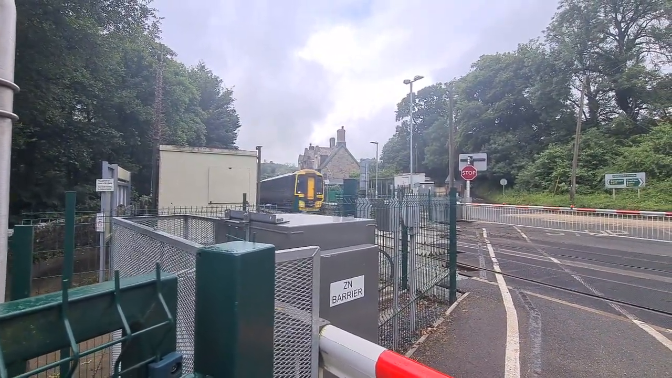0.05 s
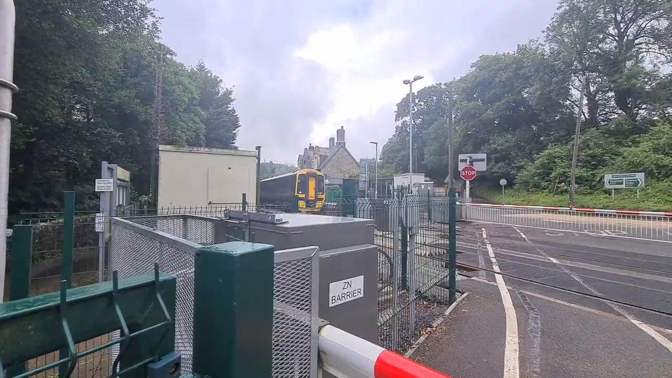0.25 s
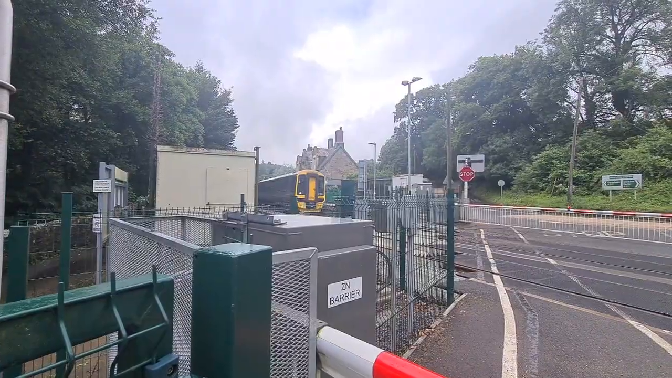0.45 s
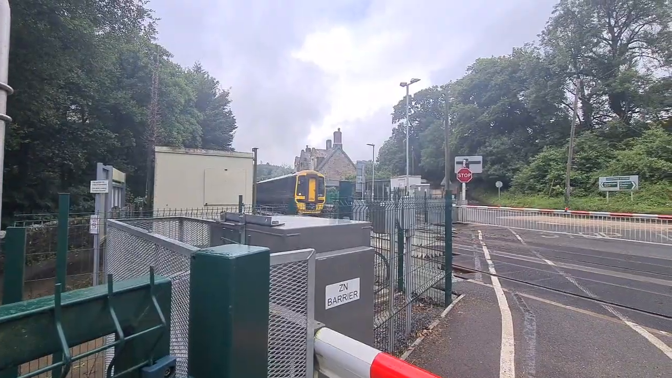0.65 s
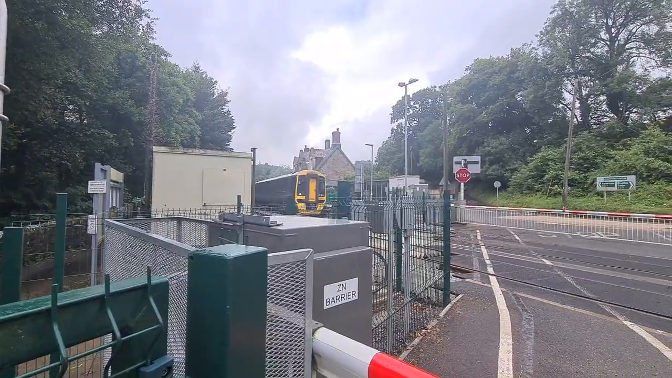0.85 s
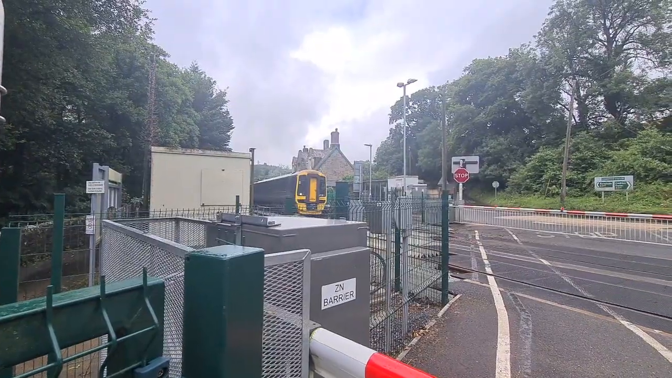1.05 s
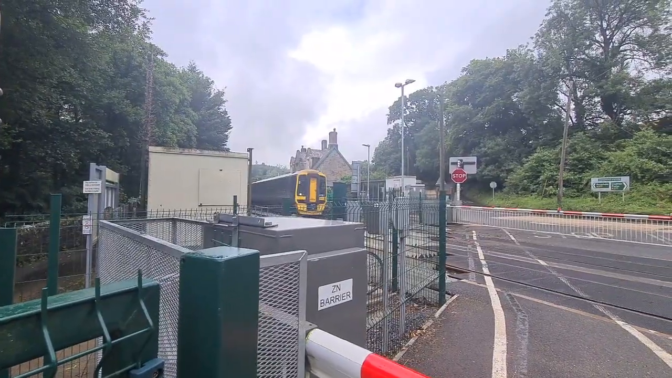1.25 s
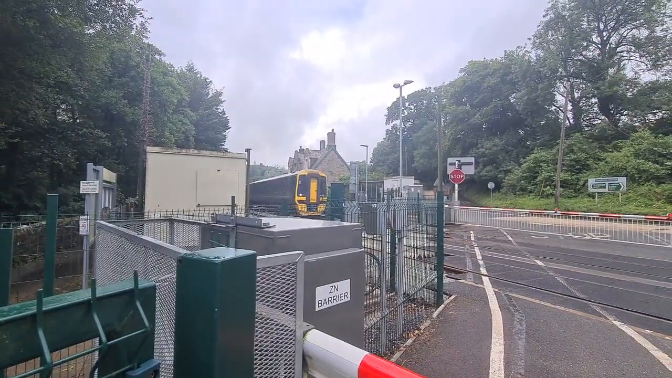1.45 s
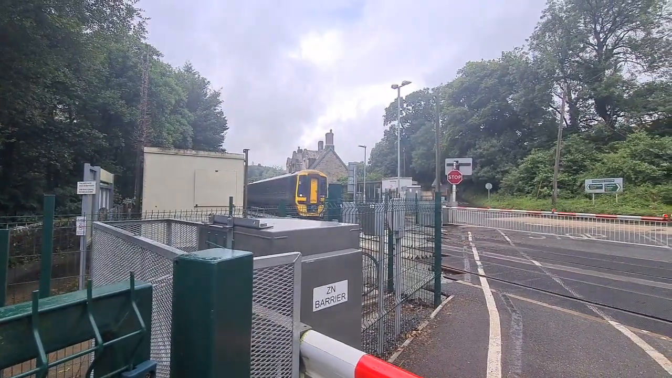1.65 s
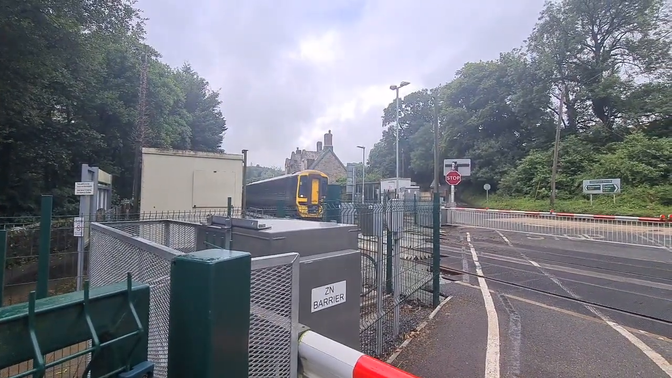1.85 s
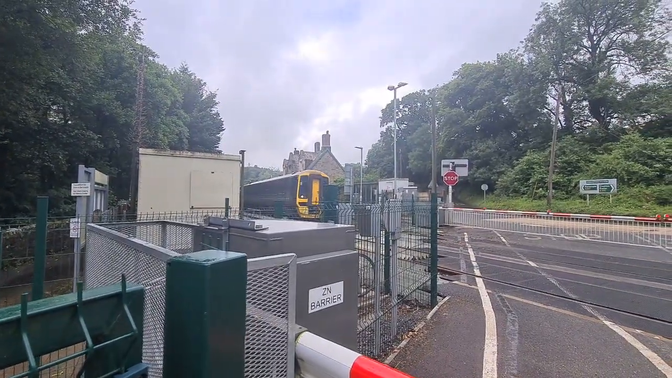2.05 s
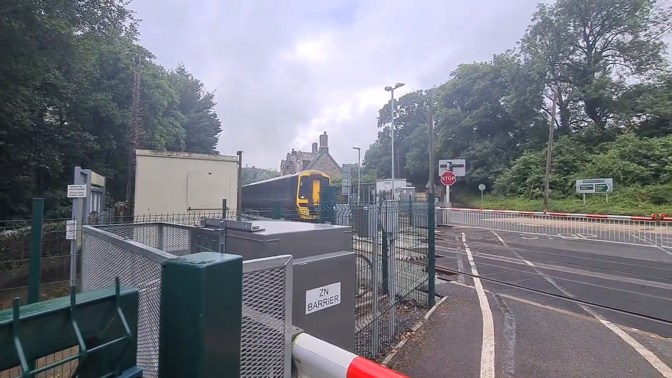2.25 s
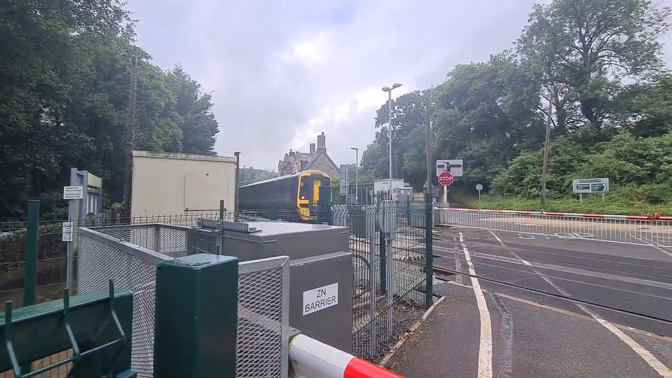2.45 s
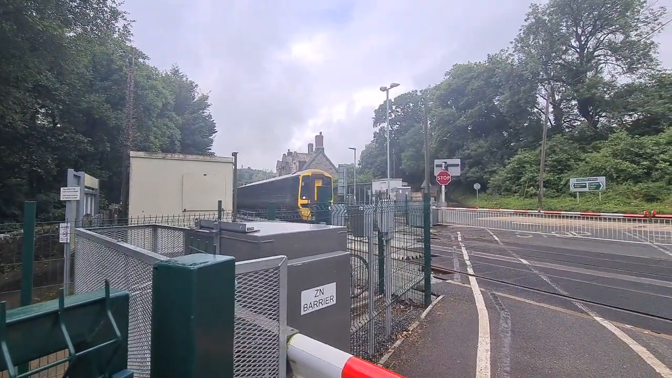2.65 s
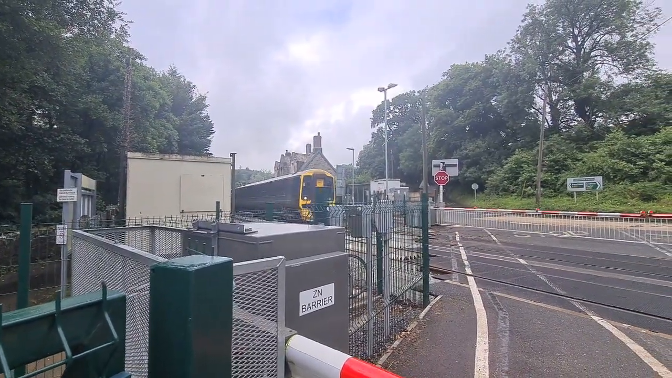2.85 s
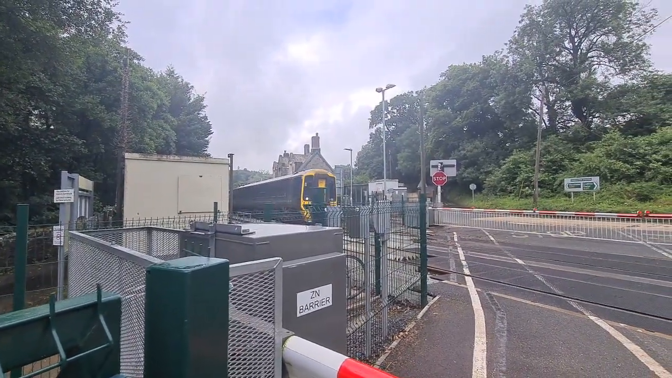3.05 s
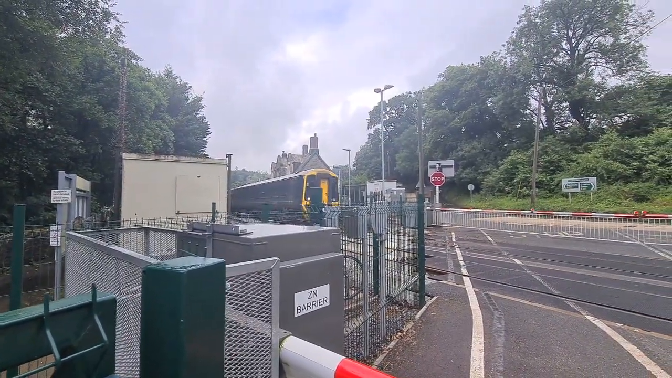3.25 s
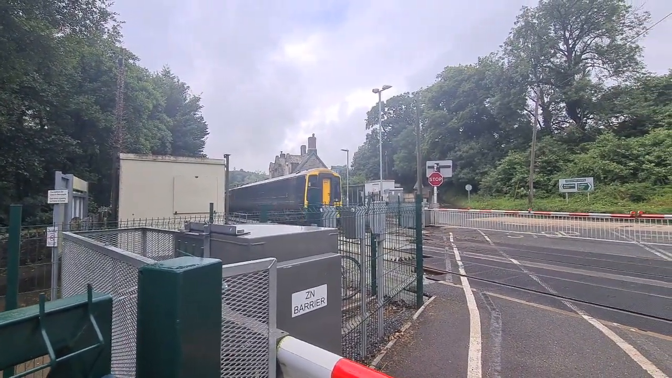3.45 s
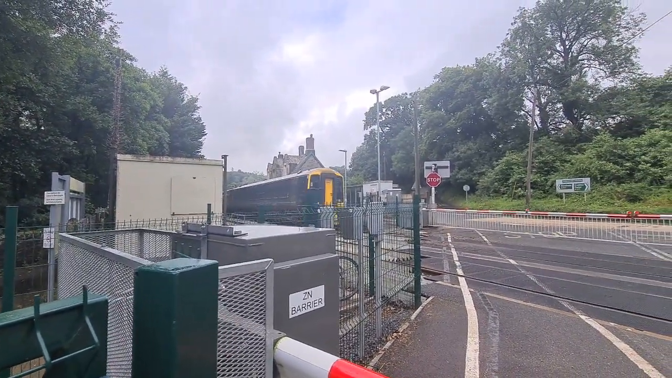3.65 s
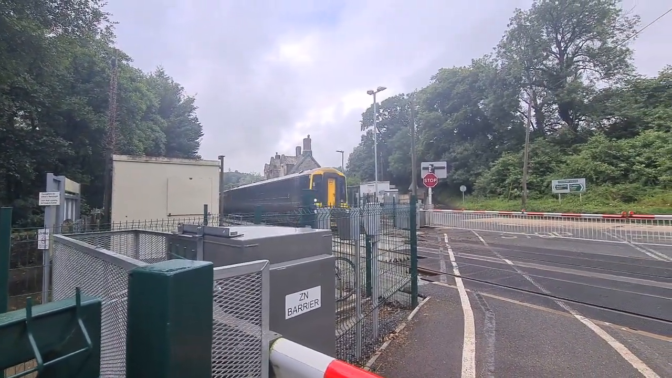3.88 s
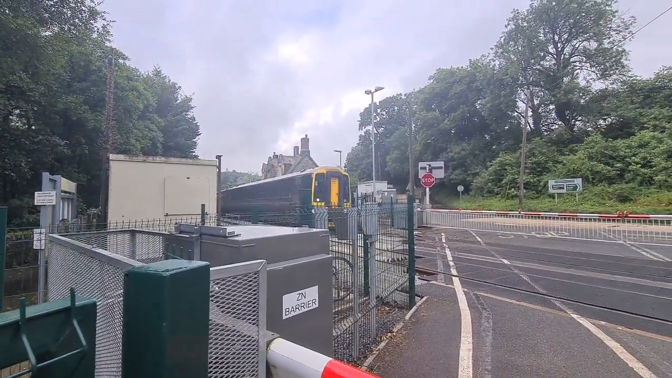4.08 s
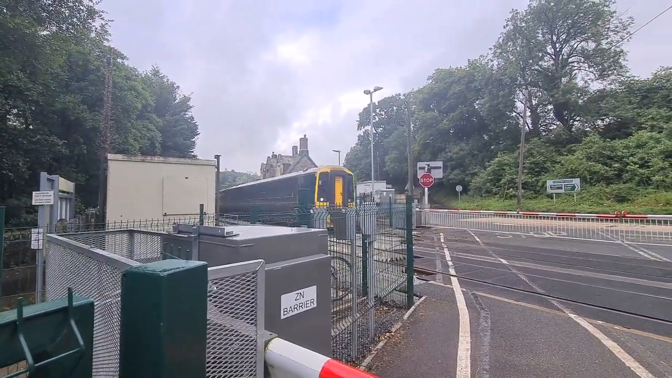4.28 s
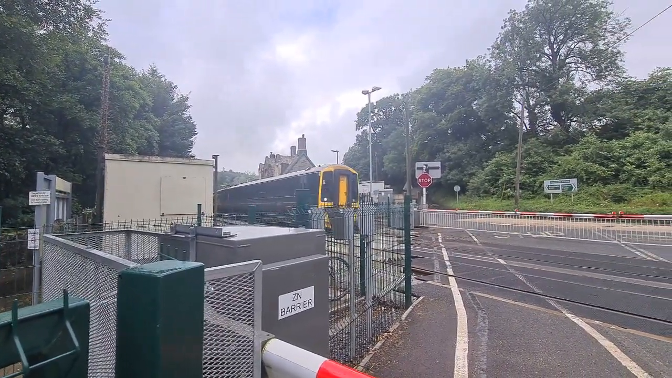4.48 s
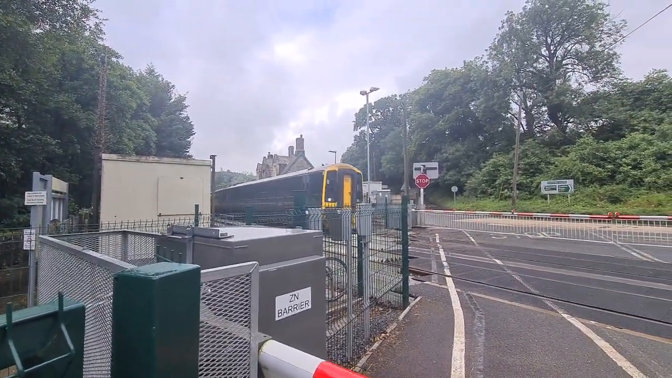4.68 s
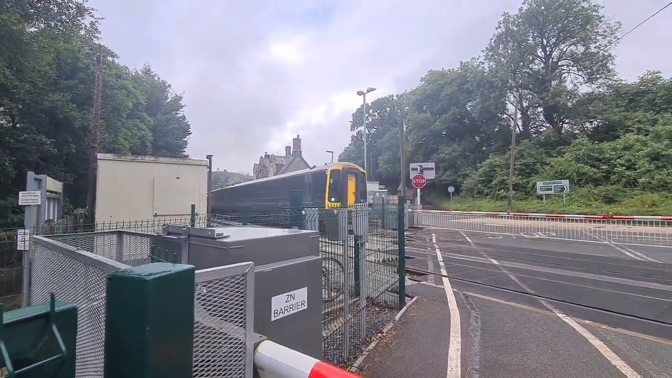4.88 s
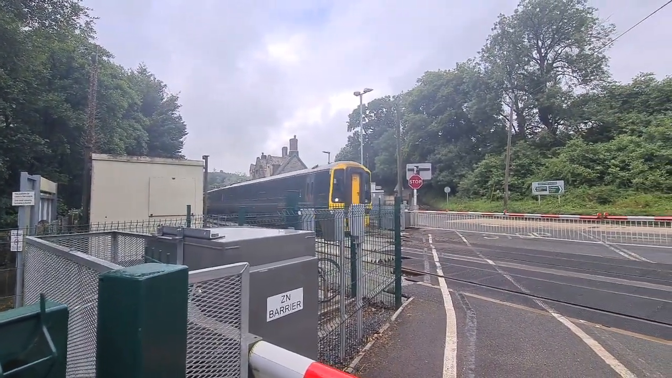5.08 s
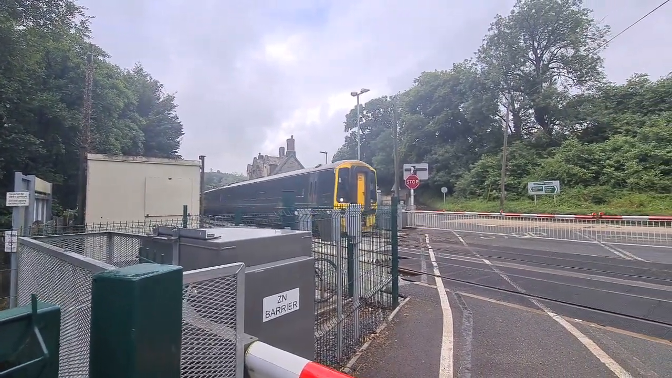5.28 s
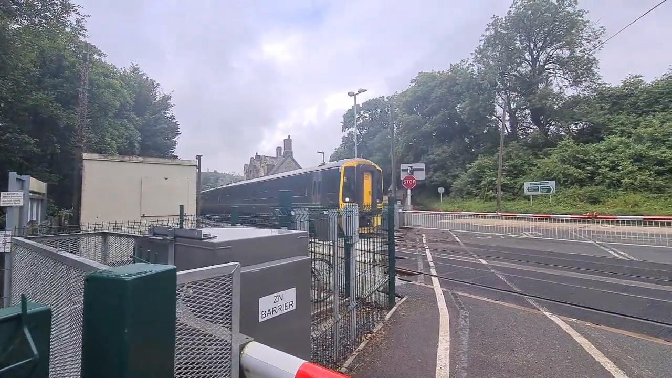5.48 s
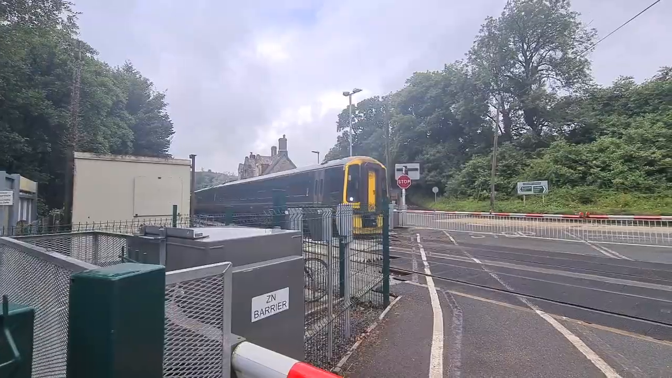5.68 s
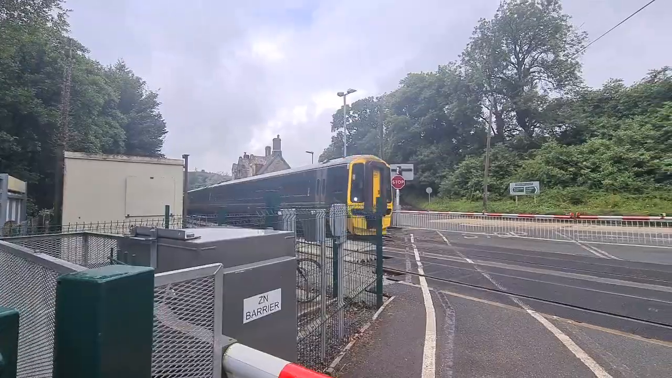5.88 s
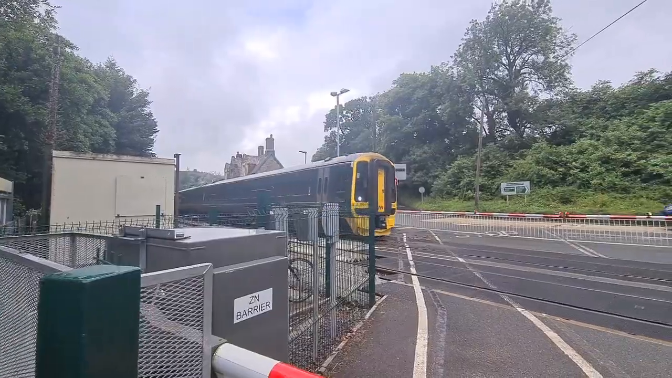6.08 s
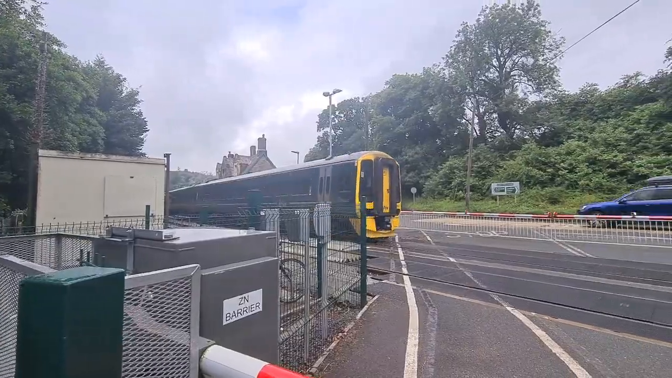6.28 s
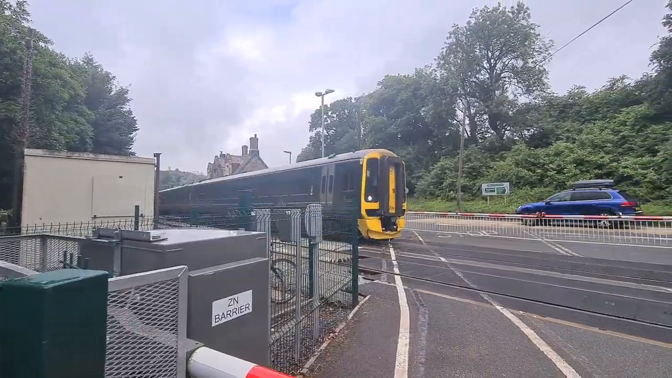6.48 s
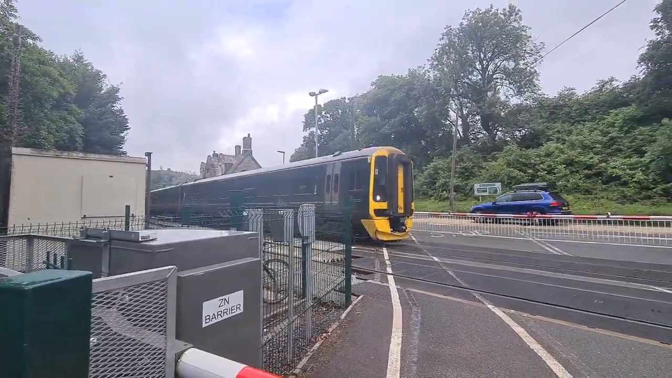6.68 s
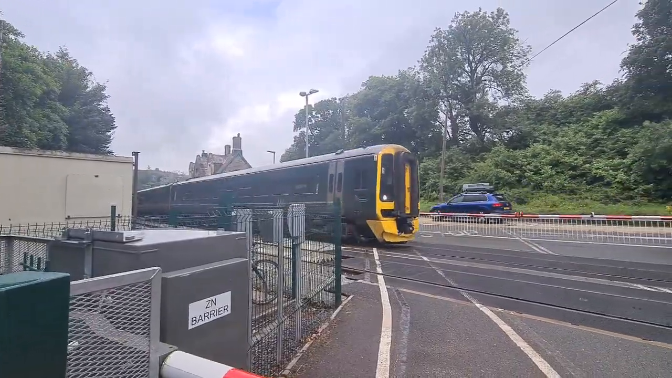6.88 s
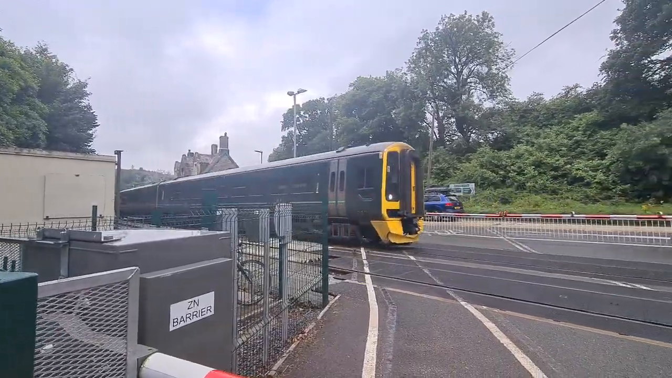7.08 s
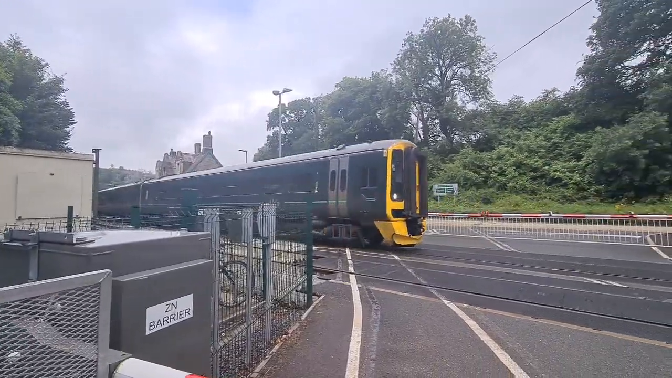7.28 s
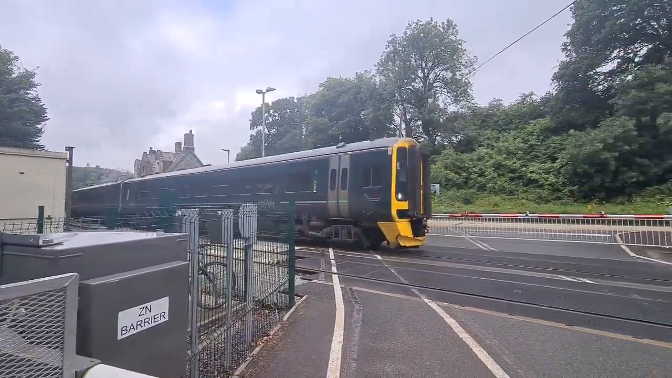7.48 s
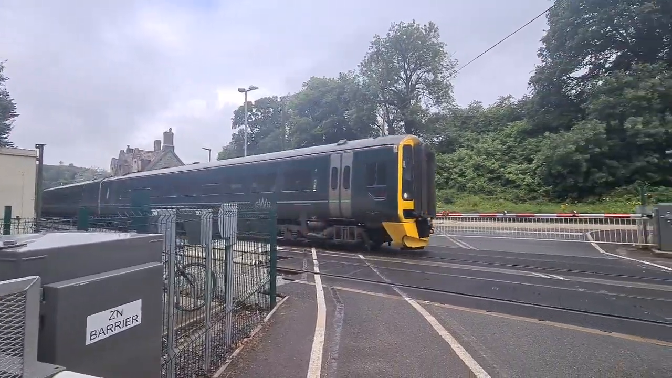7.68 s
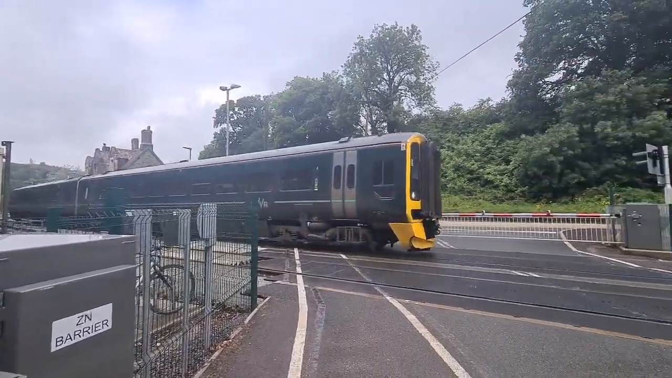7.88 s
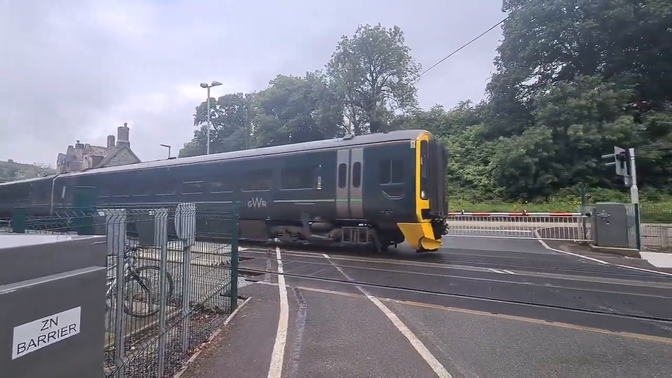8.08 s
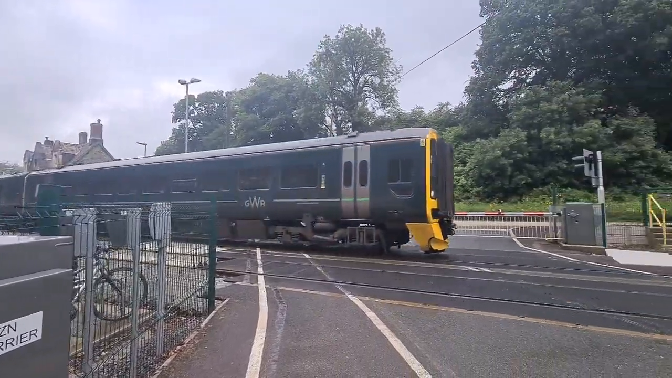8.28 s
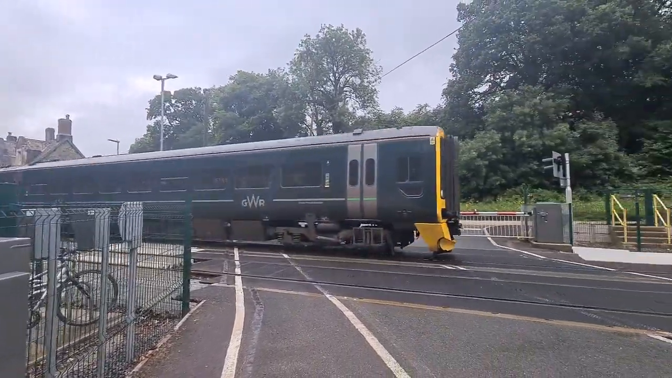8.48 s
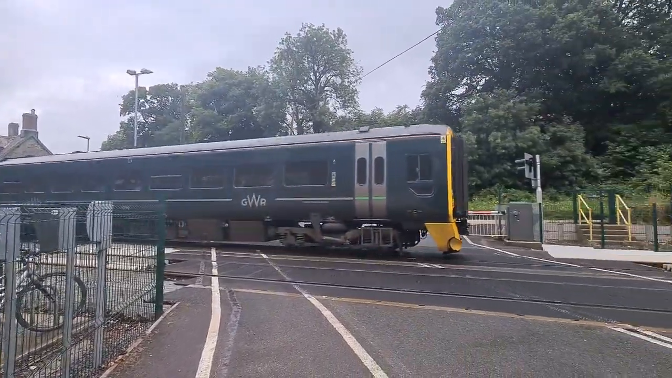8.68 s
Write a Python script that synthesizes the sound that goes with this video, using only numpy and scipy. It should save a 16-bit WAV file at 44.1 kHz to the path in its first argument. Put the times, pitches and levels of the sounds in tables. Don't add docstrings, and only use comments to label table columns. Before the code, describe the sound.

Beside an open-air level crossing, a small stereo microphone picks up a diesel train approaching. From 0 to 2 seconds a deep hum near 67 hertz dominates, swelling and nearly vanishing around 0.35, 0.9 and 1.6 seconds as two engines beat, over soft hiss and a faint whine near 1.6 kilohertz. From 2 seconds the drone is steadier, dipping near 2.8, while rumble, rough roar and gear whine grow. Dull wheel thuds fall at 4.5 and 5.4. The hum weakens again around 6.3. Between 6 and 7.1 a car passes with bright tyre hiss and several little knocks, cutting off quickly. From about 7 the train emerges close and full, with booming underframe, brighter hiss and stronger whines; small dry clacks sound from 7.8 to 8.6. The engine pitch edges upward, and everything is loudest at the end, near 8.7.

```python
import sys
import numpy as np
from scipy import signal
from scipy.io import wavfile
from scipy.ndimage import uniform_filter1d

SR = 44100
rng = np.random.default_rng(int(sys.argv[2]) if len(sys.argv) > 2 else 0)


def dump(signal):
    limited = np.clip(np.atleast_2d(signal).T, -1, 1)
    pcm = np.round(limited * 32767).astype(np.int16)
    wavfile.write(sys.argv[1], SR, pcm)


def attenuation_scalar(level_db):
    decades = np.asarray(level_db, float) / 20
    return 10 ** decades


N = 385434

# (time [s], lag [firing turns])
LAG = [(0, -.14), (.35, .5), (.92, 1.5), (1.625, 2.5), (1.9, 2.83), (2.15, 3.0), (5.5, 3.0), (6.0, 3.3),
       (6.31, 3.5), (6.55, 3.72), (7.2, 4.0)]
REAR_SHARE = 0.97
# (time [s], rate [Hz])
FIRING = [(0, 67.3), (2.5, 67.2), (3, 66.9), (4, 67.4), (5.2, 67.1), (6.3, 66.9), (7.4, 67.2), (8, 68.4),
          (8.74, 69.3)]
# (time [s], level [dB])
NOTE = [(0, -16), (.6, -14), (2.2, -16.5), (3.1, -22), (4.0, -17.5), (5.3, -21), (6.9, -19.5), (7.3, -11.5),
        (7.9, -15.5), (8.3, -10), (8.74, -13.5)]
# (multiple of the firing rate [1], level against the rumble [dB], wander [dB])
ORDERS = [(4 / 3, -13.5, 1.5), (5 / 3, -17, 5), (2.0, -14, 3.5), (7 / 3, -20, 3.5), (8 / 3, -14.5, 3.0),
          (10 / 3, -17.5, 3.0), (4.0, -17.5, 2.5)]
# (frequency [Hz], density [dB per Hz])
RUMBLE = [(90, -1), (130, -3), (170, -2.5), (220, -4.5), (280, -6.5), (330, -5), (400, -9.5), (600, -16.5)]
ROAR = [(180, -23), (300, -0.5), (441, -8.5), (554, -8), (624, -6.5), (784, -5.5), (901, -10.5), (1070, -8),
        (1190, -12.5), (1330, -5), (1430, -10), (1630, -5), (1730, -13), (2310, -18.5), (3200, -16.5),
        (4160, -47), (7040, -120)]
HISS = [(1060, -31), (1800, 1.5), (1970, -1.5), (2160, -6.5), (2430, -7), (3340, -7.5), (5180, -18),
        (5620, -16.5), (6810, -16.5), (7390, -23), (7950, -21.5), (9280, -25), (12000, -26.5),
        (15200, -32.5), (15900, -27)]
# (time [s], sixth harmonic of the tooth rate [Hz])
GEARS = [(0, 1634), (1.7, 1624), (3.2, 1613), (6.5, 1599), (7.1, 1604), (8.74, 1633)]
# (start [s], end [s], first pitch [Hz], last pitch [Hz], level [dB])
WHINES = [
    (0, 3.3, 1324, 1250, -49.5),
    (4.5, 5.9, 1662, 1648, -44),
    (7.3, 9, 1295, 1335, -40),
    (0, 2, 320, 317, -47.5),
    (8, 9, 338, 346, -31),
    (8, 9, 322, 327, -30),
]
# (time [s], frequency [Hz])
TURBO = [(1.4, 7990), (4, 7870), (6.7, 7870), (7.5, 8000), (8.74, 8290)]
# (centre [Hz], width [Hz], time clear [s], level then [dB], slope after [dB per s])
BANDS = [
    (324, 19, 7.24, -35.5, 3.5),
    (5600, 80, 7.4, -58, -2.5),
    (12000, 1100, 7.8, -55, 1),
    (3500, 300, 8.0, -50, 4),
    (1950, 70, 7.6, -44, 1),
    (1440, 370, 6.77, -35.5, 1),
]
# (time [s], level [dB], pitch [Hz], decay by 60 dB [s])
THUDS = [
    (4.53, -7, 67, .2),
    (5.364, -7, 65, .24),
]
# (enters [s], leaves [s], rise [dB per s], fall [dB per s])
CAR = (6.0, 7.08, 80, 90)
# (frequency [Hz], density [dB per Hz])
TYRES = [(1180, -31), (2000, 8), (2460, 0), (3170, -7.5), (4220, -6), (5330, -11), (6850, -12), (8510, -19),
         (11800, -17.5), (15900, -25)]
# (time [s], peak level [dB], pitch [Hz])
KNOCKS = [(6.235, -18, 659), (6.423, -20, 570), (6.529, -15.5, 665), (6.605, -23, 580), (6.802, -11.5, 600),
          (6.903, -15, 750)]
# (frequency [Hz], coherence [0-1])
SAME = [(60, 0.5), (125, 0.9), (250, 0.93), (500, 0.5), (1000, 0.7), (2000, 0.36), (4000, 0.185), (8000, 0)]
# (frequency [Hz], left lead [rad])
LEAD = [(0, .1), (67, 0.12), (300, 0.21), (600, 0.55), (950, 1.74), (1290, 1.38), (1720, 2.1), (2070, 1.2),
        (3530, 2.55), (16000, 16)]
# (frequency [Hz], left over right [dB])
TILT = [(60, -2.0), (110, -2), (200, -1.5), (380, -2), (700, -0.5), (1290, 1), (2380, 0.5), (4400, -0.5),
        (8120, 0.5), (15000, -4)]
# (time [s], level [dB], half length [s])
GROUND = (-37, [(6.2, 5, 2.3)])
# (frequency [Hz], density [dB per Hz])
SHUDDER = [(20, -22), (32, -14), (45, -8), (60, -2.5), (85, -0.5), (110, -5)]
# (time [s], depth [dB], half length [s])
FADES = [(2.8, -9.5, 0.13), (4.7, -5, 0.089), (5.75, -7.5, 0.14), (6.92, -3, .05), (7.66, -10, .1)]
# (time [s], nearness [dB])
NEAR = [(0, 0), (2, 1.5), (4, 4), (5.5, 6.5), (6.5, 9.5), (7.7, 10), (8.74, 13)]

# (level at the platform [dB], share of nearness [1])
RUMBLE_LAW, ROAR_LAW, HISS_LAW = (-36.5, 1.03), (-40, 1), (-53, 1.2)
THIRD_LAW, RING_LAW, TURBO_LAW = (-49, 1.32), (-60.5, .5), (-62, .8)
STILL_HISS_DB = -46.8
# (harmonic [1], level at the platform [dB], share of nearness [1])
TEETH = [(6, -51, 1), (5, -53, 1.23), (4, -56.5, 1.2), (7, -64.5, 1.05)]
# (harmonic, 3 exhaust, others gear [1], time [s], level [dB], half length [s])
SINGS = [(3, 3.44, 5, .4), (3, 6.0, 4, .15), (3, 7.1, 7, .2), (3, 7.95, 4, .12), (6, 1.7, 1.5, .4),
         (6, 3.2, 4, .4), (6, 4.34, -7, .5), (6, 6.5, 3, .3), (6, 7.77, 9, 0.32), (5, 7.1, 5, 0.48),
         (5, .2, -5, .6), (5, 6, -4, .4)]
WHINE_FADE_S = .15
CLEARING_DB_PER_S = 30
# (centre [Hz], width [Hz])
RING = (3260, 32)
TYRE_DB, DRONE_DB, TREAD_DB = -43, -39.5, -54
# (time [s], level [dB], half length [s])
COARSE = [
    (6.28, 10, .15),
    (7.03, 8, .1),
]
GEAR_WOBBLE_HZ = 2.2
# (time [s], peak level [dB], pitch [Hz])
CLACKS = [(7.839, -16, 961), (8.004, -17, 1300), (8.18, -19, 530), (8.349, -20, 579), (8.62, -19, 1100)]


def evened(x):
    return x / np.sqrt(np.mean(x ** 2) + 1e-20)


def read(points, hz):
    f, value = np.transpose(points)
    return np.interp(np.log(hz + 1), np.log(f + 1), value)


def play(rows):
    s, value = np.transpose(rows)
    return np.interp(np.arange(N) / SR, s, value)


def slow(rate_hz):
    t = np.arange(0, N + 256, 256) / SR
    x = 0
    for f in np.geomspace(rate_hz / 20, rate_hz, 20):
        x = x + np.sin(2 * np.pi * (f * t + rng.random())) / np.sqrt(f)
    return np.interp(np.arange(N) / SR, t, evened(x))


def swells(rows):
    t = np.arange(N) / SR
    return sum((db * np.exp(-((t - s) / half) ** 2) for s, db, half in rows), 0 * t)


def follow(law):
    platform_db, share = law
    return platform_db + share * play(NEAR)


def cleared(s, db, db_per_s):
    late = np.arange(N) / SR - s
    return db + np.where(late < 0, CLEARING_DB_PER_S, db_per_s) * late


def sings(k):
    return swells([row[1:] for row in SINGS if round(row[0]) == k])


def spectrum(points, lo_hz, hi_hz):
    def colour(hz):
        skirts = (1 + (lo_hz / (hz + 1)) ** 8) * (1 + (hz / hi_hz) ** 8)
        return read(points, hz) - 10 * np.log10(skirts)
    return colour


def hump(hz, width_hz):
    return lambda f: -20 * np.log10(1 + ((f - hz) / width_hz) ** 2)


def noise(layers, patchy_db, size=1024):
    hop = size // 4
    frames, hz = N // hop + 5, np.fft.rfftfreq(size, 1 / SR)
    a, b, c, d, patches = rng.standard_normal((frames, len(hz), 5)).T
    patches = uniform_filter1d(patches, size=8, axis=0)
    patches = evened(uniform_filter1d(patches, size=10, axis=1))
    same = np.clip(read(SAME, hz), 0, 1)
    lead = np.interp(hz, *np.transpose(LEAD))
    weak = attenuation_scalar(-read(TILT, hz))
    middle = 1 + weak ** 2 + 2 * weak * same * np.cos(lead)
    at = np.minimum(np.arange(frames) * hop, N - 1)
    power = 0
    for colour, db in layers:
        density = attenuation_scalar(2 * colour(hz))
        power = power + np.outer(density / np.sum(density * middle), attenuation_scalar(2 * db[at]))
    left = a + 1j * b
    shared = (same * np.exp(-1j * lead))[:, None] * left
    private = np.sqrt(1 - same ** 2)[:, None] * (c + 1j * d)
    right = weak[:, None] * (shared + private)
    z = np.array([left, right]) * np.sqrt(power) * attenuation_scalar(patchy_db * patches)
    x = signal.istft(z, nperseg=size, noverlap=size - hop)[1][:, :N]
    wanted_power = sum(np.mean(attenuation_scalar(2 * db)) for _, db in layers)
    return x * np.sqrt(wanted_power / np.mean(x.mean(0) ** 2))


def tone(turns, hz):
    lead, tilt_db = np.interp(hz, *np.transpose(LEAD)), read(TILT, hz)
    left = attenuation_scalar(tilt_db / 2) * np.sin(2 * np.pi * turns)
    right = attenuation_scalar(-tilt_db / 2) * np.sin(2 * np.pi * turns - lead)
    return np.sqrt(2) * np.array([left, right])


def whistle(hz, wobble_hz, wander_db, rate_hz=30.):
    turns = np.cumsum(hz + wobble_hz * slow(rate_hz)) / SR + rng.random()
    return attenuation_scalar(wander_db * slow(36.)) * tone(turns, np.mean(hz))


def blows(rows, rise_s):
    out, u = np.zeros((2, N)), np.arange(SR // 2) / SR
    for s, db, hz, t60 in rows:
        start = round(s * SR)
        decay = attenuation_scalar(db - 5.5 - 60 * u / t60)
        ring = decay * (1 - np.exp(-u / rise_s)) * tone(hz * u, hz)
        out[:, start:][:, :len(u)] += ring[:, :N - start]
    return out


def tyre_layers():
    t = np.arange(N) / SR
    enters, leaves, rise_db, fall_db = CAR
    car_db = np.minimum(np.minimum(rise_db * (t - enters), fall_db * (leaves - t)), 0)
    surge_db = 1.7 * slow(16.)
    return [(spectrum(TYRES, 2600, 17000), TYRE_DB + car_db + surge_db),
            (hump(690, 190), DRONE_DB + .6 * car_db),
            (hump(6400, 700), TREAD_DB + car_db + swells(COARSE))]


def air():
    layers = [(hump(hz, width_hz), cleared(*rule)) for hz, width_hz, *rule in BANDS[1:-1]]
    layers.append((hump(*RING), follow(RING_LAW)))
    for law in (HISS_LAW, (STILL_HISS_DB, 0)):
        layers.append((spectrum(HISS, 2120, 17000), follow(law) + 0.9))
    return noise(layers + tyre_layers(), patchy_db=1.0)


def car_knocks():
    return blows([(s, db + 3.0, hz, .035) for s, db, hz in KNOCKS], rise_s=0.00072)


def rail_thuds():
    return blows(THUDS, rise_s=0.0071)


def panel_clacks():
    return blows([(s, db - 3, hz, .025) for s, db, hz in CLACKS], rise_s=.0008)


def ground_db():
    return GROUND[0] + swells(GROUND[1])


def throb(depth):
    crank = 2 * np.pi * np.cumsum(play(FIRING)) / SR / 3
    near = depth * attenuation_scalar(.5 * (follow(ROAR_LAW) + 35))
    return 1 + near * (.09 * np.cos(crank) + 0.043 * np.cos(crank / 2) + 0.076 * np.cos(3 * crank))


def body():
    boom_hz, boom_width, *boom = BANDS[0]
    bay_hz, bay_width, *bay = BANDS[-1]
    low = noise([(spectrum(RUMBLE, 98, 420), follow(RUMBLE_LAW) - 1.5),
                 (spectrum(SHUDDER, 15, 103), ground_db()),
                 (hump(boom_hz, boom_width), cleared(*boom))], patchy_db=1.0, size=2048)
    roar = noise([(spectrum(ROAR, 427, 2290), follow(ROAR_LAW)),
                  (hump(bay_hz, bay_width), cleared(*bay))], patchy_db=1.0)
    return throb(depth=.6) * low + throb(depth=1.3) * roar


def whines():
    t, sixth_hz = np.arange(N) / SR, play(GEARS)
    out = np.zeros((2, N))
    for k, *law in TEETH:
        level = attenuation_scalar(follow(law) + sings(k) + 2.0)
        out += level * whistle(sixth_hz * k / 6, wobble_hz=GEAR_WOBBLE_HZ, wander_db=2.2)
    for start, end, from_hz, to_hz, db in WHINES:
        on = np.clip(.5 + np.minimum(t - start, end - t) / WHINE_FADE_S, 0, 1)
        hz = np.interp(t, [start, end], [from_hz, to_hz])
        out += on * attenuation_scalar(db) * whistle(hz, wobble_hz=1.43, wander_db=1.0)
    turbo_level = np.clip(.5 * t - .3, 0, 1) * attenuation_scalar(follow(TURBO_LAW) - 6.0)
    return out + turbo_level * whistle(play(TURBO), wobble_hz=50., wander_db=1.7, rate_hz=84.)


def engines():
    firing_hz, lag = play(FIRING), play(LAG)
    turns = np.cumsum(firing_hz) / SR
    pair = tone(turns + lag / 2, 67) + REAR_SHARE * tone(turns - lag / 2, 67)
    note_db = play(NOTE) + swells(FADES) + 0.26 * slow(13.0)
    note = attenuation_scalar(note_db) * pair / (1 + REAR_SHARE)
    orders = np.zeros((2, N))
    for k, db, wander_db in ORDERS:
        orders += attenuation_scalar(db + wander_db * slow(4.)) * tone(k * turns + rng.random(), 67 * k)
    second = attenuation_scalar(ground_db() - 5.5 + 2.2 * slow(4.07)) * tone(2 / 3 * turns, 45)
    third_level = attenuation_scalar(follow(THIRD_LAW) + sings(k=3))
    third = third_level * whistle(3 * firing_hz, wobble_hz=1.66, wander_db=1.0)
    return note + second + third + attenuation_scalar(follow(RUMBLE_LAW)) * orders


def scene():
    return air() + car_knocks() + rail_thuds() + panel_clacks() + body() + whines() + engines()


def band_limit(x):
    return signal.sosfilt(signal.butter(12, 16030, fs=SR, output="sos"), x)


def record(dry):
    edge = signal.firwin(601, 15680, window=("kaiser", 8), fs=SR)
    mix = signal.oaconvolve(dry, edge[None], "same")
    return band_limit(mix)


dry = scene()
out = record(dry)
dump(out)
```